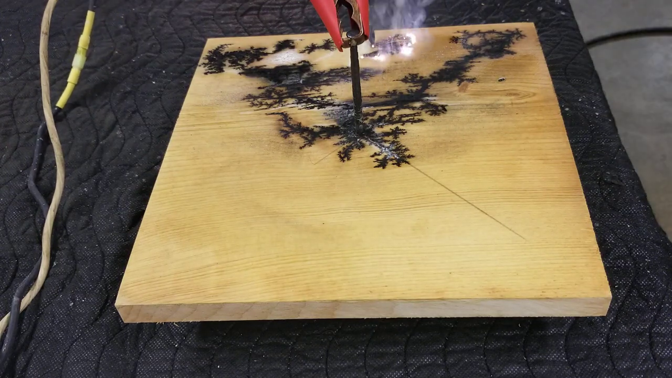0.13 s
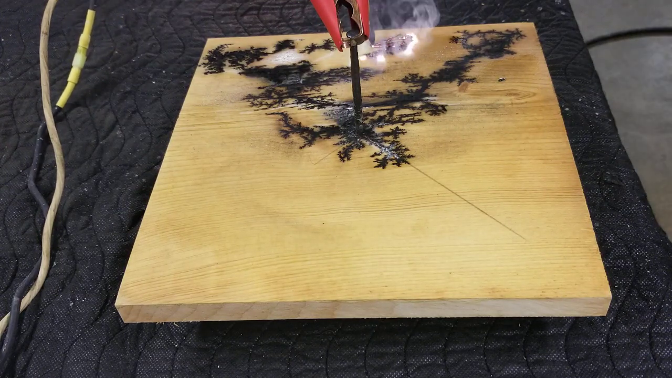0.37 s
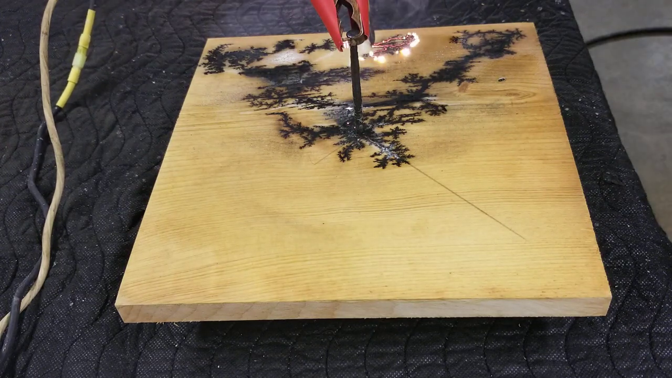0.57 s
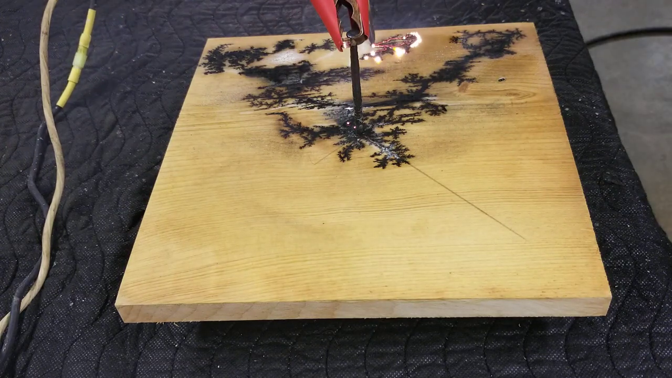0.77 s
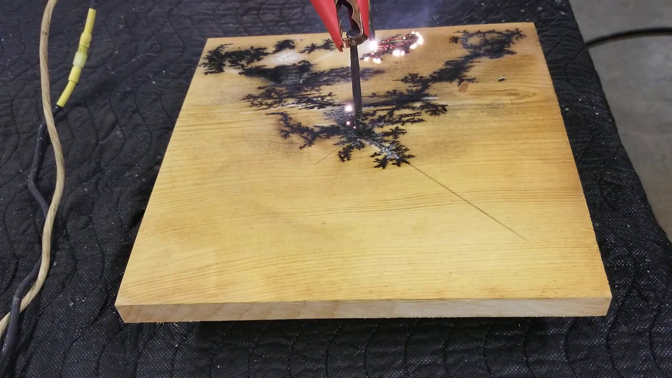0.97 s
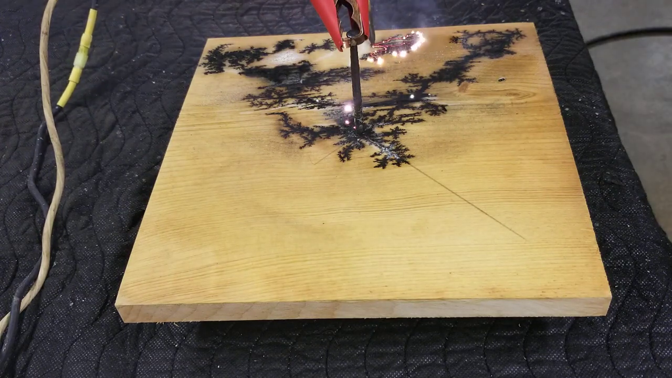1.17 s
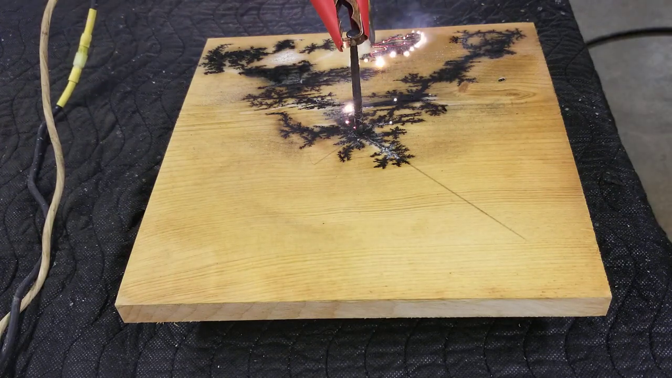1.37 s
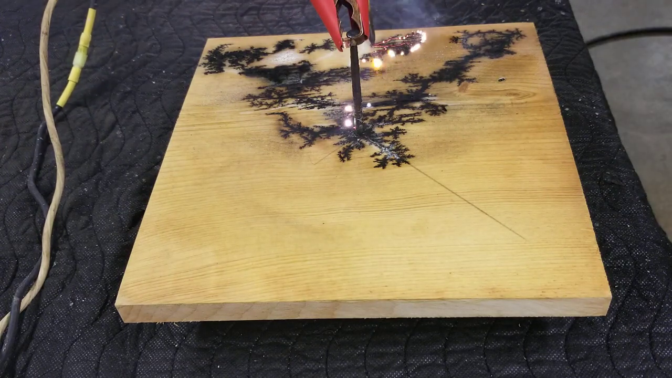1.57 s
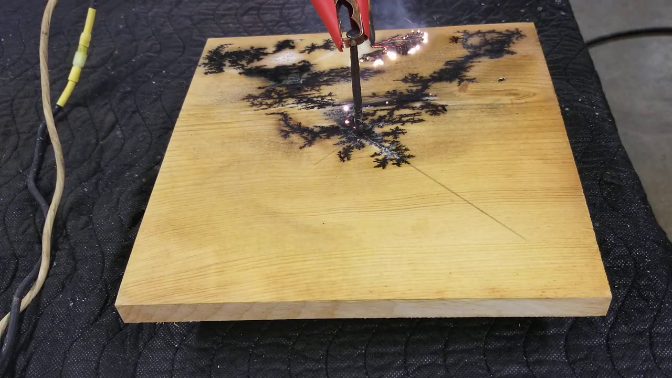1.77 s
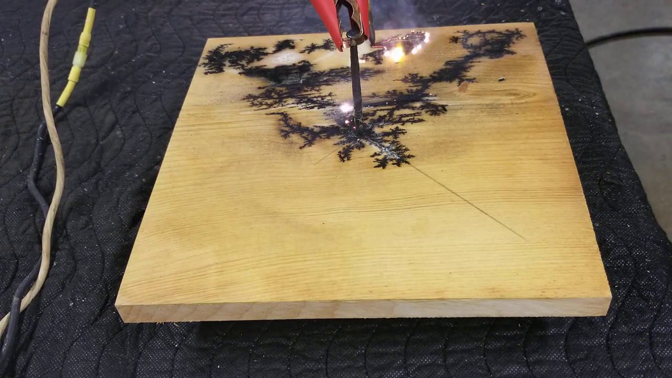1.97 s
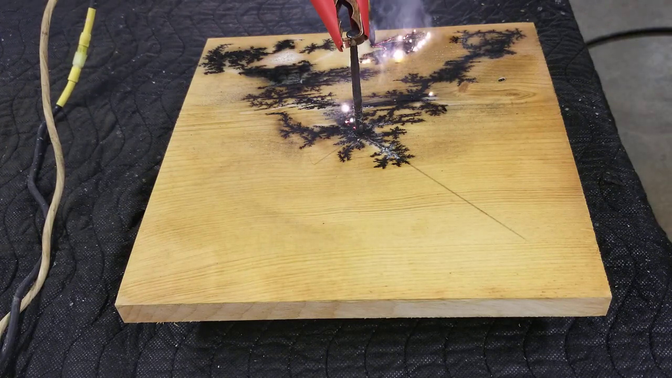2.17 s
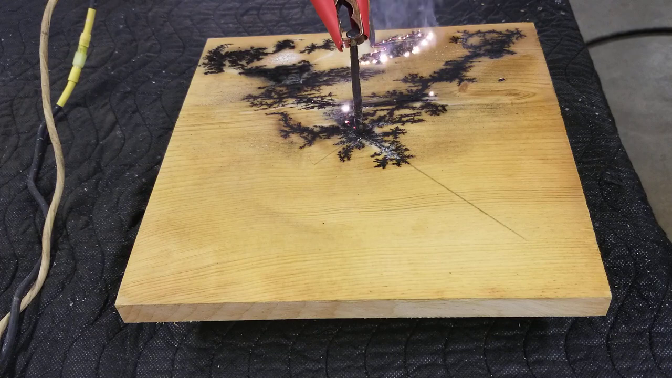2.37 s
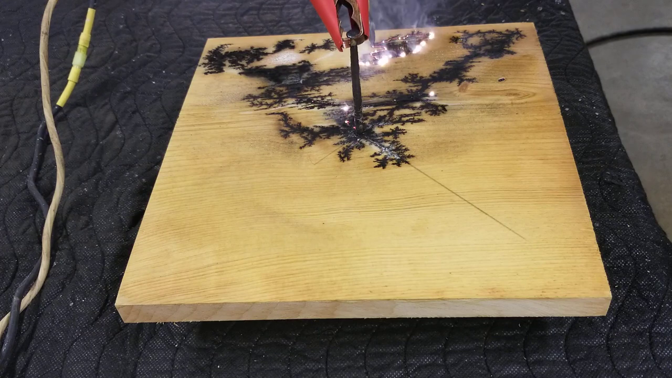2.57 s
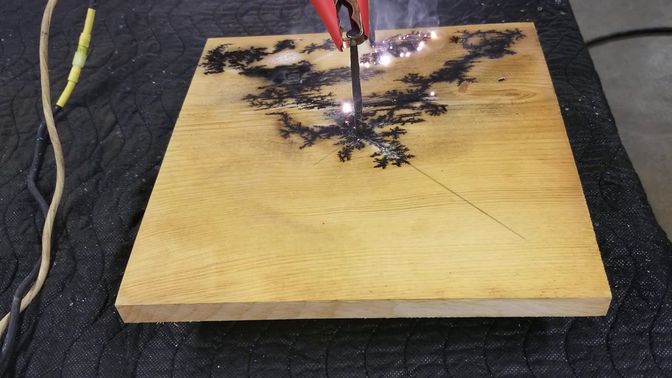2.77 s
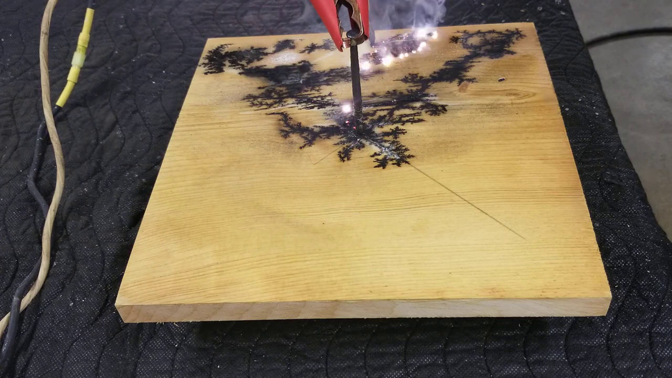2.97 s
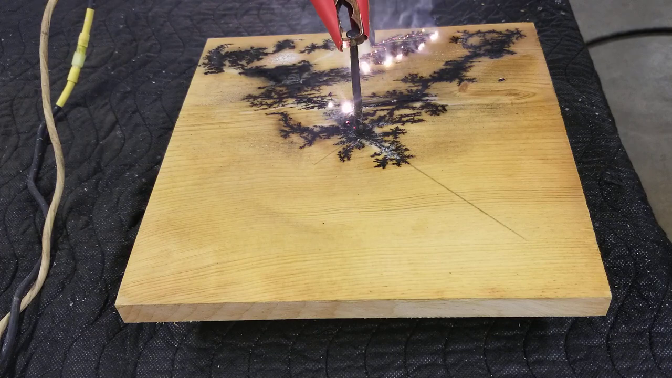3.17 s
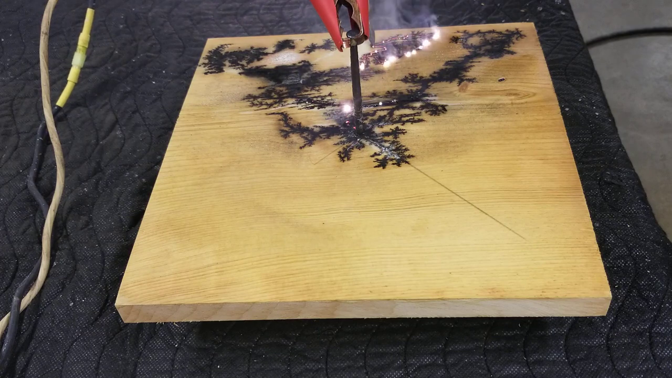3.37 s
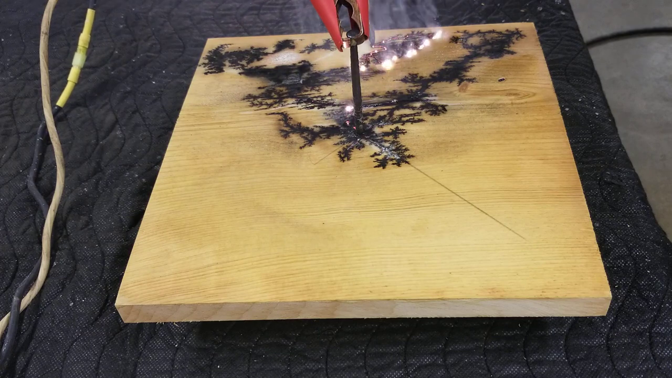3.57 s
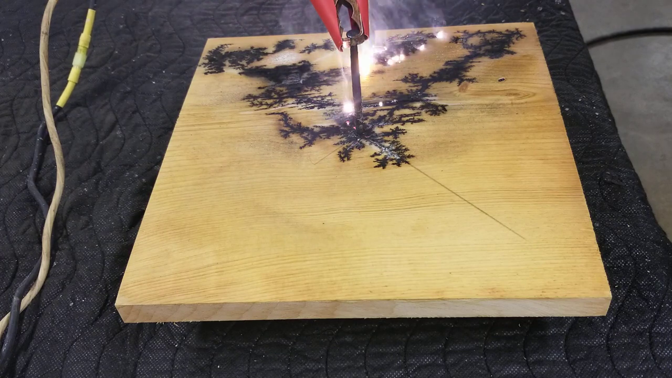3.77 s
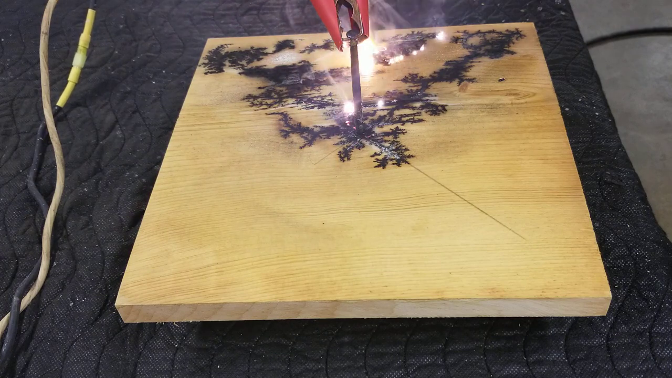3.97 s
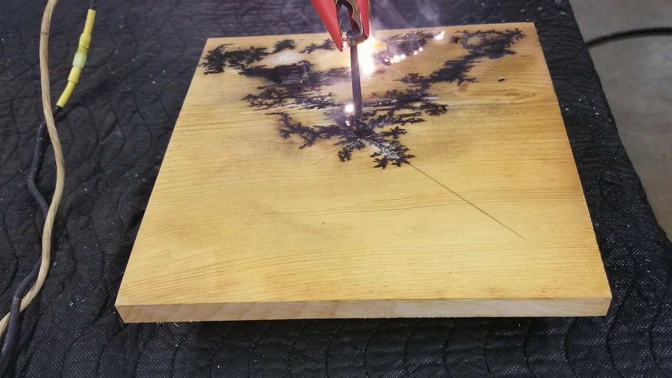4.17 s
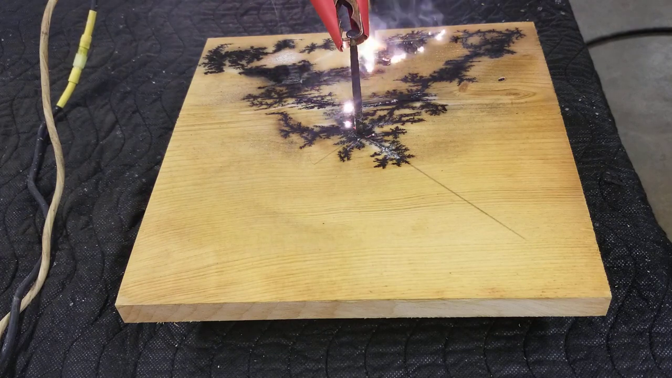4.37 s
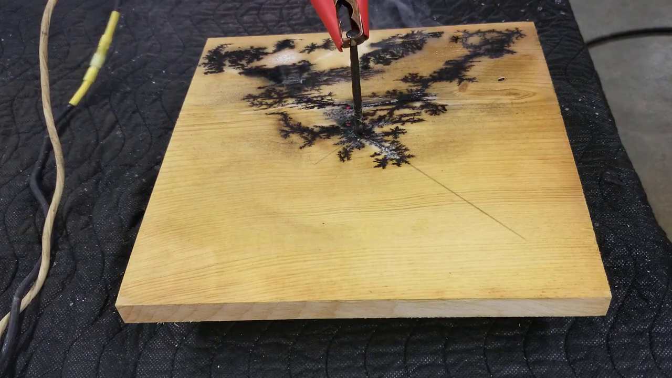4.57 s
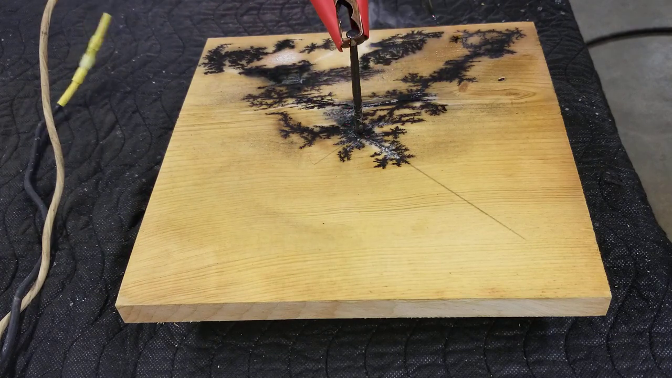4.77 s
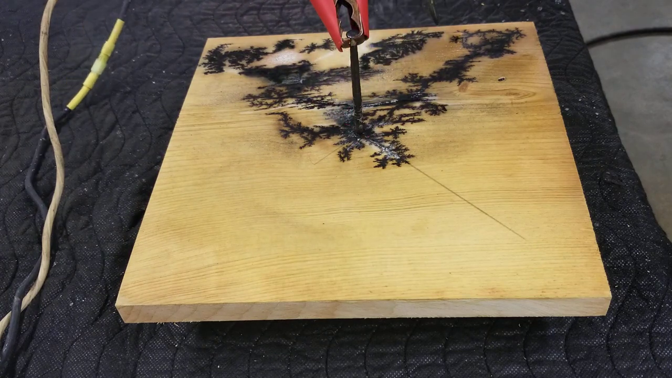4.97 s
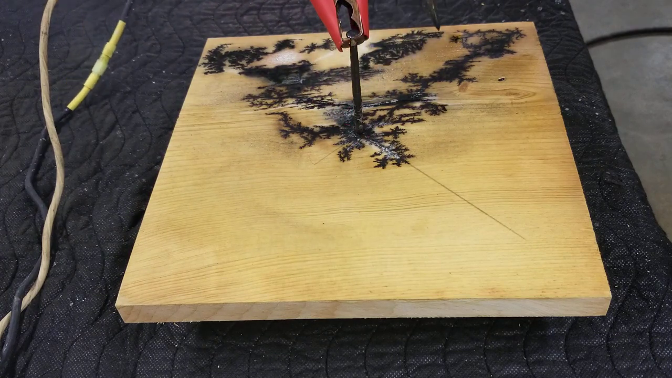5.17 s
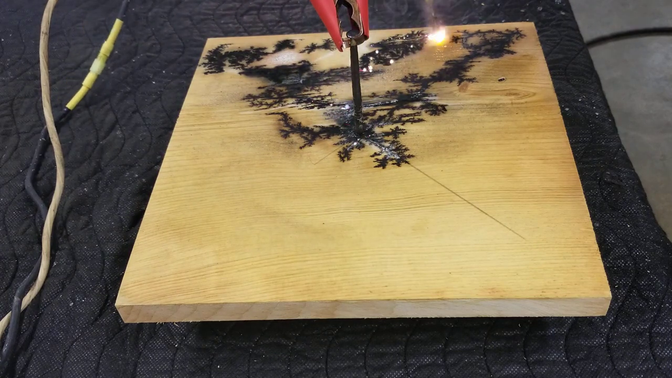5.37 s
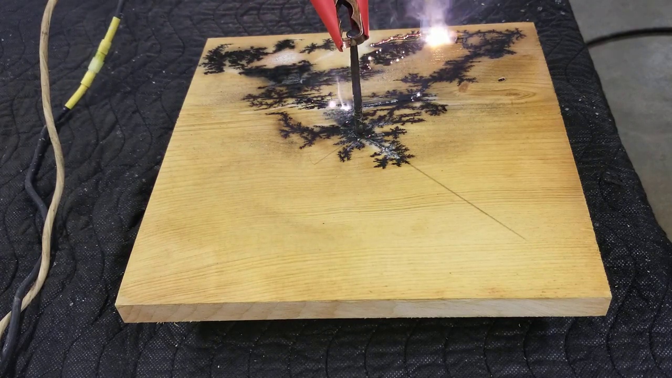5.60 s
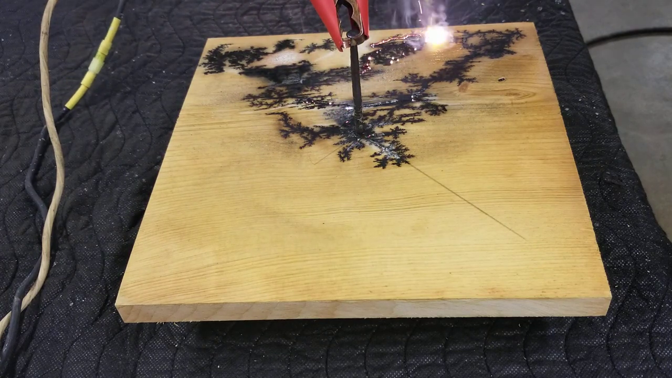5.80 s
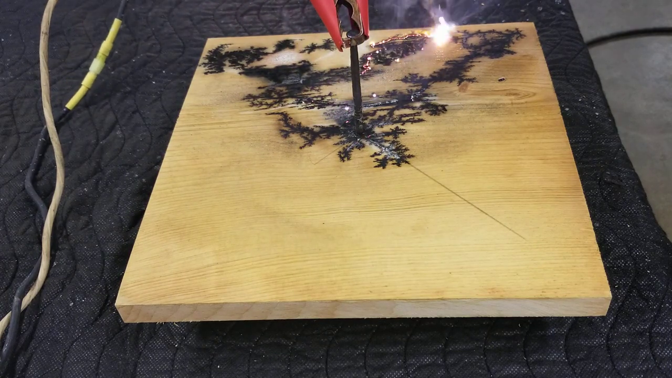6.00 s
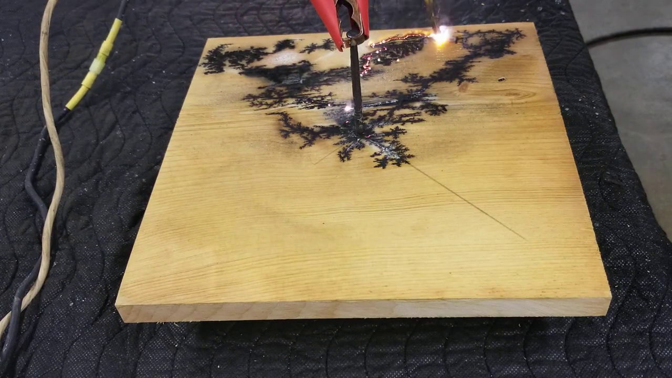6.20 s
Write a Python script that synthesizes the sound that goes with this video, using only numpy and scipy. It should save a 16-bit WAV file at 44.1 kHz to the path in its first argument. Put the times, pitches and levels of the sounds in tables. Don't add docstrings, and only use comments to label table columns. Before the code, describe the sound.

A dry, bright electrical rasp pulses at mains rate, thickened by wet wood sizzle, soft relighting pops and uneven cracks. It is close, slightly wide, with a short small-room tail. Behind it are a steady low hum, fan air and faint motor whine. The crackling drops away late, the hum softens, and then current returns with a shudder and fresh snapping until the end.

```python
import sys
import numpy as np
from scipy import signal
from scipy.fft import rfft, irfft
from scipy.io import wavfile
from scipy.ndimage import uniform_filter1d, map_coordinates

SR = 44100
rng = np.random.default_rng(int(sys.argv[2]) if len(sys.argv) > 2 else 0)


def decibels_to_gain(level_db):
    exponent = np.asarray(level_db, float) / 20
    return 10 ** exponent


def dump(signal):
    limited = np.clip(np.atleast_2d(signal).T, -1, 1)
    pcm = np.round(limited * 32767).astype(np.int16)
    wavfile.write(sys.argv[1], SR, pcm)


N = 275184

MAINS_HZ = 59.977
# (frequency [Hz], density [dB per Hz])
AIR_COLOUR = [(18, -42), (30, -21), (70, -9.5), (119, -3.5), (186, -13.5), (246, -4.5), (349, -12),
              (441, -6.5), (496, -14), (1000, -21.5), (1750, -27), (3900, -33.5), (8000, -46.5),
              (16000, -55)]
AIR_DB = -50
# (frequency [Hz], left minus right [dB])
AIR_LEAN = [(60, 1), (110, 0.5), (200, 0), (380, 2.5), (700, 3.5), (1290, 3.5), (2380, 5), (4400, 2.5),
            (8120, 7), (15000, 9)]
# (frequency [Hz], gain [ratio])
AIR_WIDTH = [(100, 0.12), (250, 0.23), (600, 0.91), (3000, .95)]
# (frequency [Hz], gain [dB])
PORT_RING = [(8000, -4.5), (8800, 0), (9500, 9.5), (10400, 3), (13000, 3.5), (15800, 1)]

# (time [s], level [dB])
HUM = [(0.0, -47.5), (0.9, -45.5), (1.1, -45), (2.5, -48), (3.3, -46), (4.36, -45.5), (4.47, -53),
       (5.18, -50), (5.26, -47.5), (5.6, -48), (5.75, -49), (6.24, -52)]
HUM_PEAK_S = .002
# (multiple of mains [ratio], level [dB], left minus right [dB])
CORE = [(2, 0.5, 1.4), (6, -31, 11), (8, -31, 5)]
# (time [s], level [dB])
THIRD = [
    (0, -63),
    (1.0, -62.5),
    (3.5, -74),
    (5.2, -71),
    (5.5, -62),
    (6.24, -62),
]
FOURTH_DB, FOURTH_FOLLOWS = -55, .35
INRUSH_S, INRUSH_DB, INRUSH_T60_S = 5.229, -43, .3
# (frequency [Hz], gain [dB])
RATTLE = [(40, -60), (120, -27), (250, -2), (500, 7), (900, -26), (2000, -60)]
# (rotation [Hz], level [dB], first peak [s])
SHAFTS = [(56.25, -62, .00156), (58.574, -63.8, -.00456), (54.928, -66, -.00684), (57.452, -75, -.0058)]
FAN_A_HZ, FAN_B_HZ = 56.215, 54.383
SHAFT_WANDER_S = .0002
# (multiple of shaft [ratio], level [dB], left minus right [dB])
FAN_A = [(2, -64, 10.5), (4, -101, 7), (8, -62, -8), (10, -70.5, 8), (14, -101, 2), (20, -75, -6)]
FAN_B = [(8, -56.5, 7.5), (10, -68, 5.1), (16, -78.5, 10), (20, -72.5, 11), (26, -76, 2)]

CREST_S, RELIGHT_S = .0057, .0008
# (time [s], crest crackle [dB], sizzle of wet wood [dB], flame puff [dB])
ARC = [
    [(0.0, -34.5, -43, -56.5), (0.22, -50, -41, -51.5), (0.45, -31, -39.5, -49), (0.92, -43, -41, -55.5),
     (1.11, -31, -41, -51), (1.8, -35.5, -43.5, -52), (2.45, -39.5, -43, -55.5), (2.88, -33.5, -43, -53),
     (3.4, -33.5, -43, -53.5), (3.54, -31.5, -45, -50.5), (3.78, -42.5, -42.5, -51), (4.3, -42, -38, -50.5),
     (4.4, -36, -45, -51.5)],
    [(5.23, -28, -42, -47.5), (5.42, -38, -40, -50), (5.72, -38.5, -44.5, -50), (6.13, -35.5, -50.5, -51.5),
     (6.24, -41, -46, -51)],
]
# (time [s], peak [dB], puff under it [dB])
SNAPS = [(0.3371, -27, -28), (0.4214, -21, -22), (0.6709, -24, -30), (1.0879, -20.5, -26),
         (1.288, -13.5, -26), (1.3553, -19, -24), (1.4885, -17, -29), (1.5549, -17.5, -20),
         (1.7554, -19, -24), (1.7719, -17.5, -20), (1.8377, -22.5, -11.5), (1.9545, -24, -16.5),
         (2.1715, -24.5, -12.5), (2.2543, -20, -21), (2.7891, -24, -15), (2.8225, -19.5, -17.5),
         (2.8714, -20.5, -18), (3.0719, -20.5, -20), (3.5049, -18, -18), (3.6057, -26, -14),
         (5.24, -18, -26), (5.2565, -20, -11), (5.2734, -17, -14), (5.4899, -20, -19), (5.5069, -19, -13),
         (5.5742, -24.5, -16), (5.5907, -21.5, -25), (5.7743, -22.5, -13.5), (5.9569, -24.5, -24),
         (6.0906, -20, -18)]
# (time [s], peak [dB])
MORE_SNAPS = [(0.4878, -20), (0.5382, -21), (0.605, -24.5), (0.9877, -30), (1.2052, -20.5), (1.3214, -19.5),
              (1.3872, -21), (1.6382, -23.5), (1.8552, -19), (2.3381, -28), (2.5217, -27), (2.6718, -28),
              (2.9223, -20), (3.039, -19.5), (3.1552, -23.5), (3.4386, -18), (3.5553, -19.5), (4.091, -25),
              (4.291, -25), (5.44, -21), (5.6565, -23), (5.7068, -38), (5.7568, -25), (5.8401, -23),
              (5.9739, -21.5), (6.0067, -21.5), (6.0234, -29), (6.0731, -20), (6.1581, -22.5), (6.1748, -23)]
MORE_SNAPS_PUFF_DB = -20.5
# (time [s], afterglow [dB], flare on the crest [dB], first pop [dB], second pop [dB])
FLAME = [
    (0, -19, 0, 3.5, -10),
    (1.0, -17, 2, -1, -14),
    (3.5, -13, 6.5, -4, -15),
    (3.82, -8.5, -2.5, 2, 6.5),
    (4.4, -18, -6, -1, 5),
    (5.2, -13, 3, 2, -14),
    (5.5, -22, 4, 4, -14),
    (6.24, -18, 1, -10, -14),
]
POP_DB = -62.5
# (time [s], crest delay [ms], left lag [samples], left top octave [dB], right top octave [dB])
SITE = [
    (0, -0.057, 2.95, 0, -2),
    (1.0, -0.16, 2.64, 0, -3),
    (3.5, 0.017, 2.59, 5, -9),
    (3.7, 0.061, 2.13, 8, 7),
    (4.4, -0.055, 2.8, 2, -6),
    (5.2, 0.36, 3.7, -2, 2),
    (5.5, 0.47, 3.4, 4, 3),
    (6.24, 0.56, 3.1, -17.5, -3),
]
# (frequency [Hz], density [dB per Hz])
CRACKLE = [(1760, -74), (3000, -16.5), (4020, -14), (4500, -16), (4910, -12.5), (7480, -10.5), (8620, -8.5),
           (9460, -2.5), (11400, -2), (15000, 0.5), (15600, 0.5), (16200, -19.5), (16500, -30)]
# (frequency [Hz], density [dB per Hz])
PUFF = [(60, -60), (300, -12.5), (800, -16), (1100, -1.5), (1600, 0.5), (2500, -1), (4000, -2.5),
        (7000, -8.5), (10000, -30)]
# (frequency [Hz], gain [dB])
TOP_OCTAVE = [(11000, -30), (12500, -11.5)]
PUFF_TREBLE = [(1800, -35), (2600, -3.5)]
# (frequency [Hz], left minus right [dB])
PORTS = [(700, 4.5), (2000, 1.5), (4400, 2.5), (8000, -1.2), (9200, 13), (11500, 3.5), (12500, 3.5),
         (16000, -1)]
ROOM_T60_S, ROOM_DB, FIRST_WALL_S = 0.29, -7, 0.0033
TREBLE_T60_S = 0.19

TOP_HZ = 15840
# (frequency [Hz], gain [dB])
TOP_EDGE = [(TOP_HZ - 200, 0), (TOP_HZ - 60, -6), (TOP_HZ + 120, -70)]
# (time [s], length [ms], share left empty [0-1])
THINNED = [(0.3, 44, .45), (0.494, 10, .7), (1.277, 5, .8), (1.71, 40, .4), (1.953, 14, .8), (2.675, 7, .8),
           (5.232, 5, .7), (5.478, 12, .9), (5.575, 16, .9), (5.798, 26, .5), (5.893, 36, .45),
           (5.932, 23, .9), (5.958, 46, .45), (6.045, 14, .4), (6.064, 12, .9), (6.078, 24, .55)]
THINNED_HZ, SPILL_S, SPILL_HZ = (3300, 8900), .003, 16600


def unit(x):
    return x / np.sqrt(np.mean(x ** 2))


def table(rows):
    hz, value = np.transpose(rows)
    return np.interp(np.log(np.arange(N // 2 + 1) * SR / N + 1), np.log(hz), value)


def colour(x, db):
    return irfft(rfft(x) * decibels_to_gain(db), N)


def curves(spans):
    s, *columns = np.concatenate(spans).T
    t = np.arange(N) / SR
    live = sum((t >= span[0][0]) & (t <= span[-1][0]) for span in spans)
    return live, [np.interp(t, s, c) for c in columns]


def walk(rate):
    k = int(SR / rate)
    held = np.repeat(rng.standard_normal(N // k + 1), k)
    return 1.03 * uniform_filter1d(uniform_filter1d(held, k), k)[:N]


def air():
    mid, side = rfft(rng.standard_normal((2, N)))
    side = side * table(AIR_WIDTH)
    lean = decibels_to_gain(table(AIR_LEAN) / 2)
    both = np.array([(mid + side) * lean, (mid - side) / lean])
    wash = irfft(both * decibels_to_gain(table(AIR_COLOUR) + table(PORT_RING)), N)
    return unit(wash) * decibels_to_gain(AIR_DB + 0.21 * walk(4.35))


def lines(hz, rows, wobble_db, peak_s):
    out = np.zeros((2, N))
    for k, db, pan_db in rows:
        tone = np.sqrt(2) * np.cos(2 * np.pi * round(k) * hz * (np.arange(N) / SR - peak_s))
        pan = np.array([[pan_db], [-pan_db]]) / 2
        out += tone * decibels_to_gain(db + wobble_db * walk(6) + pan)
    return out


def fans():
    shafts = sum(lines(hz, [(1, db, 0)], 0, peak_s) for hz, db, peak_s in SHAFTS)
    whine_a = lines(FAN_A_HZ, FAN_A, 1.1, rng.random())
    whine_b = lines(FAN_B_HZ, FAN_B, 2.0, rng.random() + SHAFT_WANDER_S * walk(9))
    return shafts + whine_a + whine_b


def transformer():
    hum_db, third_db = curves([HUM])[1][0], curves([THIRD])[1][0]
    core = lines(MAINS_HZ, CORE, 0.27, HUM_PEAK_S) * decibels_to_gain(hum_db)
    core += lines(MAINS_HZ, [(3, 0, 1)], 1.5, HUM_PEAK_S) * decibels_to_gain(third_db)
    fourth = lines(MAINS_HZ, [(4, FOURTH_DB, 2.6)], 0.6, HUM_PEAK_S)
    core += fourth * decibels_to_gain(FOURTH_FOLLOWS * (hum_db + 44))
    since = np.arange(N) / SR - INRUSH_S
    rattle = unit(colour(rng.standard_normal(N), table(RATTLE)))
    onset = (since / 0.0084).clip(0, 1)
    return core + rattle * onset * decibels_to_gain(INRUSH_DB - 60 * since.clip(0) / INRUSH_T60_S)


def ports(x, lag):
    return np.array([map_coordinates(x, [np.arange(N) - lag], order=3, mode="nearest"), x])


def sparks(spread_db, alike, lag, one_way):
    size = rng.standard_normal((3, N)) - one_way
    size = size * decibels_to_gain(spread_db * rng.exponential(size=(3, N)).clip(0, 6))
    shared, left, right = size - size.mean()
    alike = np.clip(alike, 0, 1)
    return np.sqrt(alike) * ports(shared, lag) + np.sqrt(1 - alike) * np.array([left, right])


def relight_pops(first_db, second_db):
    at = (RELIGHT_S + np.arange(int(2 * MAINS_HZ * N / SR)) / MAINS_HZ / 2) * SR
    jolt = rng.standard_normal((len(at), 2)).T
    at = (at + 9.8 * jolt[0]).astype(int).clip(0, N - 1)
    half_db = np.where(np.arange(len(at)) % 2, second_db[at], first_db[at])
    pops = np.zeros(N)
    pops[at] = -decibels_to_gain(POP_DB + half_db + 37.5 + 4.2 * jolt[1])
    pops = signal.sosfilt(signal.butter(2, 1900., fs=SR, output="sos"), pops)
    return signal.sosfilt(signal.butter(2, 850., "high", fs=SR, output="sos"), pops)


def arc():
    live, (crackle_db, sizzle_db, puff_db) = curves(ARC)
    _, (delay_ms, lag, *top_db) = curves([SITE])
    _, (glow_db, crest_db, first_db, second_db) = curves([FLAME])
    puff_db = puff_db + 1.3 * walk(8)
    turns = (np.arange(N) / SR - CREST_S - delay_ms / 1000) * MAINS_HZ
    cycle = np.floor(turns + .2).astype(int).clip(0)
    chance = rng.standard_normal((cycle[-1] + 1, 7)).clip(-1.6, 1.6).T

    from_crest_ms = (turns - cycle) / MAINS_HZ * 1000 - 0.25 * chance[0][cycle]
    length_ms = (1.4 - 0.46 * delay_ms) * np.exp(0.21 * chance[1][cycle])
    swarm = np.exp(-np.abs(from_crest_ms / length_ms) ** 1.75)
    swarm_db = crackle_db + 3.5 + (2.14 + 3.2 * delay_ms) * chance[2][cycle].clip(-2, .9)
    burst_db = puff_db + crest_db + 3.06 * chance[3][cycle]
    for s, peak_db, under_db in SNAPS + [(*tick, MORE_SNAPS_PUFF_DB) for tick in MORE_SNAPS]:
        here = cycle == round((s + .001 - CREST_S) * MAINS_HZ)
        swarm_db[here] = peak_db - 5.5
        burst_db[here] = peak_db + under_db - 2.5

    glow = decibels_to_gain(glow_db + 2.5 * chance[4][cycle]) * np.exp(-np.abs((from_crest_ms - 3.6) / 2.6) ** 3)
    flow = 1 - .6 * sum(np.exp(-((from_crest_ms - ms) / 1.3) ** 2) for ms in (-3.5, 13.2))
    sizzle = flow * decibels_to_gain(sizzle_db - 4.0 + 1.3 * walk(39.32))
    bright = (swarm + glow) * decibels_to_gain(swarm_db) + sizzle
    back_half = np.exp(-np.abs((from_crest_ms - 9.6) / 2.8) ** 3)
    dull = (swarm + glow) * decibels_to_gain(burst_db) + decibels_to_gain(puff_db) * (0.71 * back_half + 0.33)

    crackle = unit(colour(sparks(1.3, 0.55, lag, one_way=0.4), table(CRACKLE)))
    puff = unit(colour(sparks(3.55, 0.62, lag, one_way=1.52), table(PUFF)))
    beam = decibels_to_gain(np.array(top_db) + 3.1 * chance[5][cycle]) - 1
    crackle += beam * colour(crackle, table(TOP_OCTAVE))
    puff += (decibels_to_gain(3.6 * chance[6][cycle]) - 1) * colour(puff, table(PUFF_TREBLE))
    pops = ports(relight_pops(first_db, second_db), lag)
    return live * (bright * crackle + dull * puff + pops)


def room(x):
    t = np.arange(SR // 2) / SR
    noise = rng.standard_normal((2, len(t))) * (t > FIRST_WALL_S)
    low = signal.sosfiltfilt(signal.butter(2, 5000., fs=SR, output="sos"), noise)
    slow, fast = [np.exp(-np.log(1000) * t / t60) for t60 in (ROOM_T60_S, TREBLE_T60_S)]
    tail = low * slow / np.linalg.norm(slow) + (noise - low) * fast / np.linalg.norm(fast)
    return x + signal.fftconvolve(x, decibels_to_gain(ROOM_DB) * tail, axes=1)[:, :N]


def scene():
    lean = table(PORTS) / 2
    return air() + fans() + transformer() + colour(room(arc()), np.array([lean, -lean]))


def low_pass(x):
    return signal.sosfilt(signal.butter(12, 17140, fs=SR, output="sos"), x)


def record(dry):
    wide = signal.stft(dry, SR, nperseg=128)[2]
    hz, s, z = signal.stft(colour(dry, table(TOP_EDGE)), SR, nperseg=128)
    patches = np.kron(rng.random((22, len(s) // 4 + 1)), np.ones((3, 4)))[:len(hz), :len(s)]
    middle = 1 - np.abs(2 * hz - sum(THINNED_HZ)) / (THINNED_HZ[1] - THINNED_HZ[0])
    open_top = ((hz > TOP_HZ) & (hz < SPILL_HZ))[:, None]
    for start, length_ms, share in THINNED:
        end = start + length_ms / 1000
        spill = open_top & (s >= start - SPILL_S) & (s <= end + SPILL_S)
        z[:, spill] = wide[:, spill] * decibels_to_gain(1.0)
        empty = (s >= start) & (s <= end) & (patches < 1.5 * share * middle[:, None])
        z[:, empty] *= decibels_to_gain(-38)
    mix = signal.istft(z, SR, nperseg=128)[1][:, :N]
    return low_pass(mix)


dry = scene()
out = record(dry)
dump(out)
```